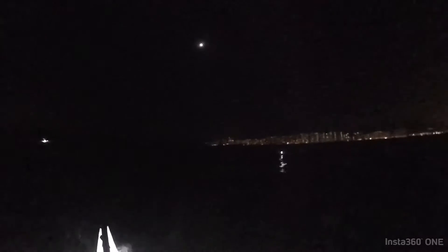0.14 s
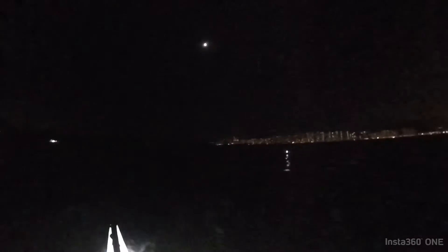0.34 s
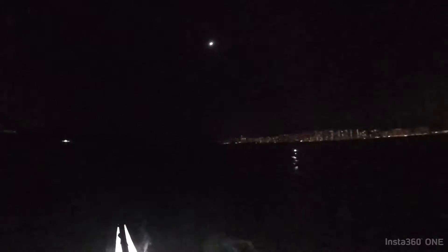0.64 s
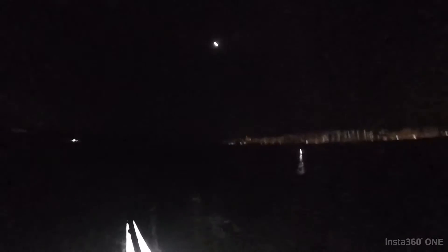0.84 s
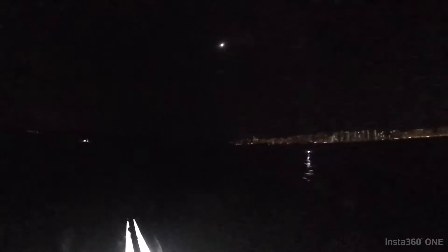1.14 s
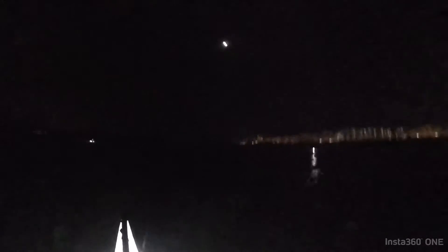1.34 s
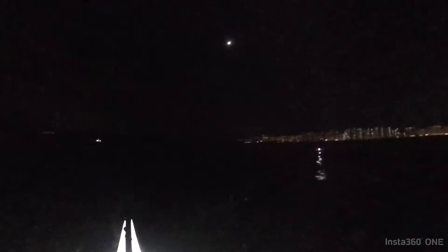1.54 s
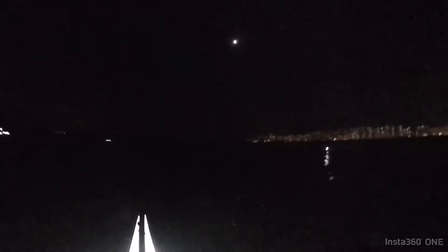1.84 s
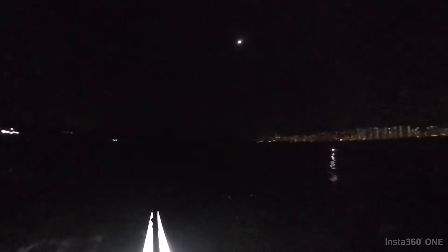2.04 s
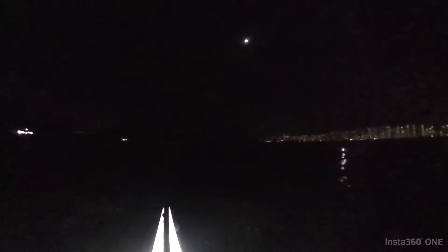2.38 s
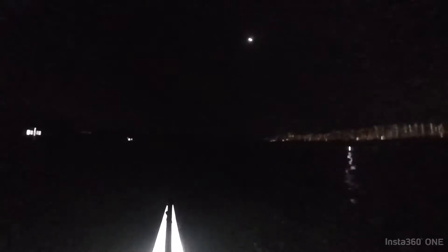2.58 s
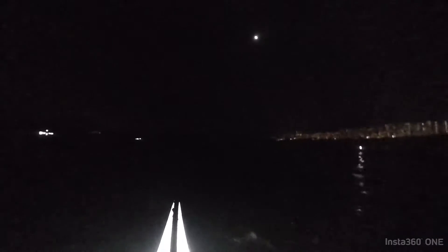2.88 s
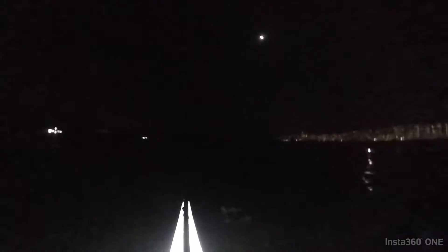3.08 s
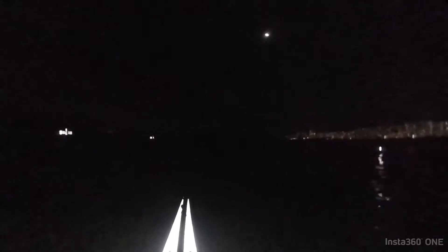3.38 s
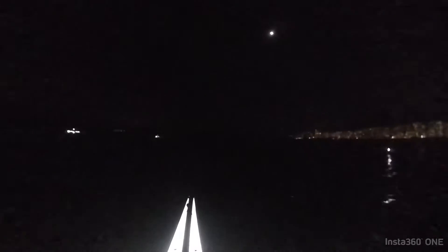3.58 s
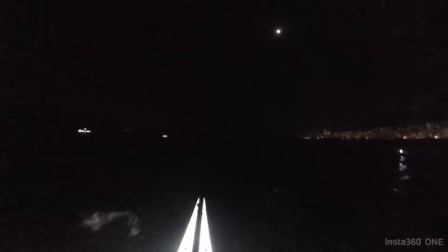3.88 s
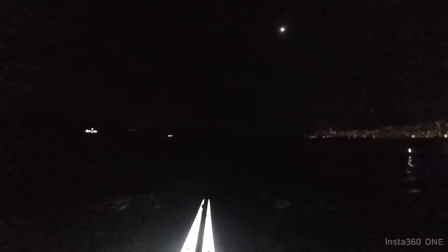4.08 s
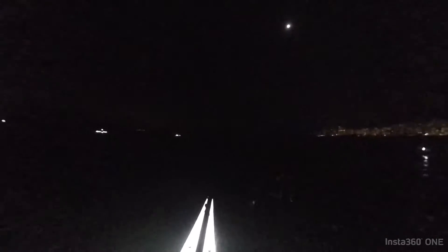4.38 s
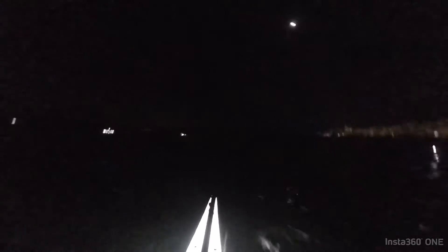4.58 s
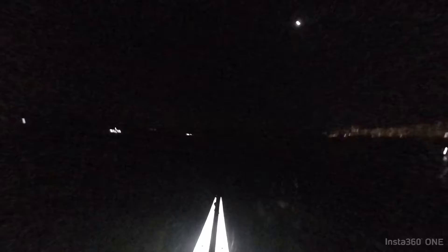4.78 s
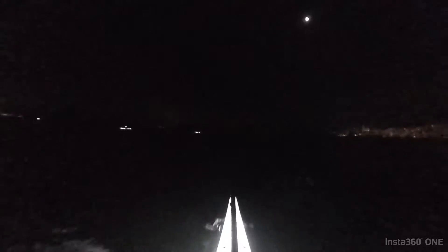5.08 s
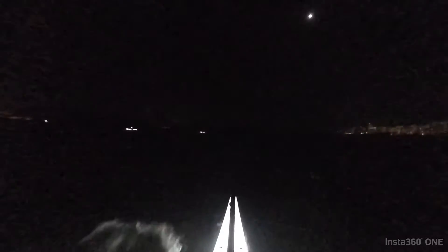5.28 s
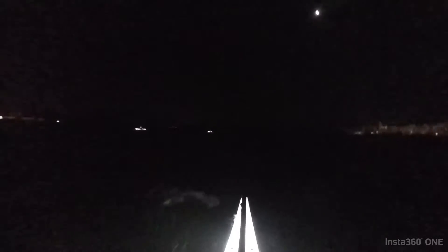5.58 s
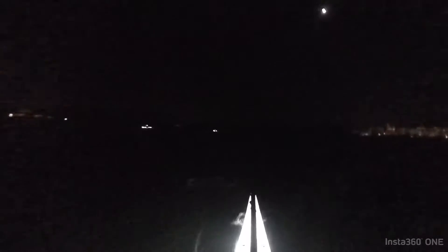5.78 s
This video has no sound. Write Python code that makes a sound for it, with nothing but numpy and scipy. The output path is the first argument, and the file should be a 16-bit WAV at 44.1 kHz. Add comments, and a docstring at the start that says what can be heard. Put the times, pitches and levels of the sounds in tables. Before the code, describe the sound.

Quiet choppy water heard through a camera housing: weak bumps and ticks, small bubble plops, then four harder thumps and brief splashes.

```python
"""Small boat in choppy water

Heard by a camera in a waterproof housing. Wash, spray and mist are noise and bubble grains through
the housing resonances; bubbles, drops, slaps and gurgles are damped or swelling tones.
Wind and spray on the microphone port give thumps, ticks, soft pressure lumps and sloshes, shaped by
the leak and tube of the port. Filtered noise gives a low rumble and microphone hiss."""
import sys
import numpy as np
from scipy.fft import rfft, irfft, next_fast_len
from scipy.io import wavfile
from scipy.ndimage import uniform_filter1d, map_coordinates

SR = 44100
rng = np.random.default_rng(int(sys.argv[2]) if len(sys.argv) > 2 else 0)


def output_pcm(signal):
    """Save a mono or channel-first signal as 16-bit PCM at the path in sys.argv[1].

    Samples are clipped to [-1, 1] before scaling.
    """
    pcm = np.clip(np.atleast_2d(signal).T, -1, 1) * 32767
    wavfile.write(sys.argv[1], SR, np.round(pcm).astype(np.int16))


N = 261513
TIME_S = np.arange(N) / SR

# rumble of hull and wind: time_s, level_db
RUMBLE_LEVEL = [(0.0, -59), (0.3, -69.5), (1.6, -68), (2.4, -68.5), (2.53, -62.5), (2.75, -69),
                (3.9, -72.5), (4.22, -65.5), (5.27, -63.5), (5.45, -67.5), (5.93, -75)]
# rumble spectrum: freq_hz, relative_density_db
RUMBLE_SPECTRUM = [(12, -70), (20, -51), (38, -6), (102, -4.5), (173, -4), (206, -12), (262, -12),
                   (500, -16.5), (650, -42), (1100, -120)]
# microphone hiss spectrum: freq_hz, relative_density_db
HISS_SPECTRUM = [(150, -1), (600, 6.5), (2000, 0.5), (5000, -5), (14900, -4.5), (15250, -3), (15400, -48)]
# gurgles under the hull: middle_s, peak_db, mean_pitch_hz, fade_s (to 1/e on either side)
GURGLES = [(2.504, -58, 166.3, 0.028), (4.234, -56, 111.6, 0.059)]
# flow past the hull: time_s, wash_db, spray_db
WASH_LEVELS = [(0.0, -60, -65.5), (0.18, -65, -75.5), (0.5, -66.5, -73), (0.6, -63, -74), (0.8, -68, -71.5),
               (1.57, -67, -75), (1.68, -60.5, -63), (1.76, -50.5, -61.5), (1.92, -65.5, -72.5),
               (2.3, -69.5, -81.5), (2.85, -65.5, -73.5), (3.29, -77, -81), (3.72, -65.5, -69),
               (3.85, -63.5, -67), (4.33, -65.5, -74.5), (4.8, -62.5, -70.5), (5.35, -60, -66.5),
               (5.5, -52.5, -59), (5.66, -55, -61), (5.77, -68, -71.5), (5.93, -56.5, -70.5)]
# finest mist: time_s, level_db
MIST_LEVEL = [(0.0, -70), (0.21, -74.5), (0.74, -70), (1.2, -78), (1.68, -69.5), (1.92, -76), (2.16, -79),
              (3.5, -79), (3.9, -71.5), (4.33, -76.5), (4.81, -68), (5.46, -69.5), (5.5, -64), (5.65, -62),
              (5.77, -72)]
# main cavity modes: freq_hz, width_hz, relative_db
CAVITY_MODES = [(640, 270, -7.5), (1020, 190, -2), (1296, 131, 0), (1602, 174, -3)]
# housing wall modes: freq_hz, width_hz, relative_db
WALL_MODES = [(2910, 280, -6), (4055, 330, 0.5), (4930, 570, -2.5), (5770, 500, -2.5)]
# highest housing modes: freq_hz, width_hz, relative_db
HIGHEST_MODES = [(9140, 790, -5), (10860, 900, -1.5), (12900, 680, -3.5)]
# clearest bubbles: start_s, peak_db, pitch_hz
BUBBLES = [(0.572, -54, 1240), (0.603, -49, 1270), (1.812, -48, 1100), (2.591, -45.5, 1185),
           (3.467, -45, 1260), (3.808, -48.5, 1390), (3.845, -53, 1580), (3.877, -54, 1640),
           (4.246, -51.5, 1215), (4.458, -43, 1080), (4.518, -48.5, 1250)]
# spray drops on the housing: time_s (each sounds DROP_DELAY_S later), peak_db, pitch_hz
DROPS = [(1.611, -51, 10900), (1.6212, -33, 10640), (1.647, -48, 10500), (1.894, -45, 6040),
         (2.862, -44, 5470), (4.987, -42, 4030), (5.3265, -41, 9500)]
# small slaps of water on the housing: start_s, nominal_level_db
SLAPS = [(5.5201, -31), (5.5315, -40), (5.539, -41.5)]
# water sloshing over the port: start_s, length_s, level_db (ahead of the port)
SLOSHES = [(0.073, 0.025, -55), (0.674, 0.015, -39.5), (1.731, 0.073, -56), (2.965, 0.033, -55.5),
           (3.011, 0.032, -58.5), (3.662, 0.044, -49.5), (5.617, 0.032, -58)]
# slosh spectrum ahead of the port: freq_hz, relative_density_db
SLOSH_SPECTRUM = [(60, -9), (220, -2), (800, -24)]
# soft lumps ahead of the port: crest_s, peak_pressure (negative pulls), fall_ms (to 1/e)
LUMPS = [(.079, -0.01, 0.72), (0.087, -0.023, 14), (.344, 0.013, 2.2), (0.462, 0.014, 2.6),
         (.475, -0.042, 1.18), (.489, 0.017, 2.2), (0.677, -0.012, 2), (0.854, 0.0079, 3),
         (0.986, -.013, 1.33), (1.07, 0.011, 3.3), (1.261, -0.029, 3), (1.277, 0.025, 2.8),
         (1.305, 0.017, 1.2), (1.458, -0.012, 2.2), (1.476, 0.015, 1.34), (1.761, 0.018, 5.5),
         (2.756, -0.0055, 0.5), (2.983, -0.017, 3.8), (3.0442, 0.023, 9.5), (3.0484, -0.025, 1.8),
         (3.692, 0.015, 4), (3.7153, 0.019, 1.8), (3.858, -0.01, 0.4), (3.889, -0.0094, 1.3),
         (3.976, -0.0071, 0.53), (5.244, 0.024, 1.8), (5.33, 0.015, 0.33), (5.414, 0.018, 1.2),
         (5.625, 0.0055, 2.1)]
# sharp ticks ahead of the port: start_s, first_jerk_pressure (negative pulls), decay_ms
TICKS = [(0.1106, -0.099, 0.23), (0.1188, -0.016, 0.16), (0.1495, -0.011, 0.085), (0.152, 0.062, 0.31),
         (0.343, 0.014, 0.2), (0.4854, -0.032, 0.093), (1.27, 0.016, 0.21), (1.759, 0.013, 0.28),
         (1.7719, -0.032, 0.31), (1.7814, -0.036, 0.22), (1.7956, -0.028, 0.14), (3.0429, -0.017, 0.24),
         (3.0716, -0.016, 0.28), (3.6733, 0.018, 0.55), (3.6861, -0.029, 0.26), (3.6918, -0.061, 0.27),
         (3.6934, -0.045, 0.1), (3.6979, -0.033, 0.12), (3.7144, -0.098, 0.068), (3.7186, -0.03, 0.21),
         (4.0094, -0.012, 0.11), (4.3435, -0.0086, 0.13), (5.2529, -0.11, 0.2), (5.2568, -0.026, 0.19),
         (5.369, -0.024, 0.15), (5.3825, -0.025, 0.15), (5.64, 0.015, 0.33), (5.648, -0.053, 0.26),
         (5.655, -0.1, 0.2), (5.6658, 0.031, 0.38)]
# spells of rattling spray, four ticks each: start_s, length_s, nominal_pressure
RATTLES = [(1.776, 0.018, -0.016), (5.365, 0.024, -0.008), (5.647, 0.016, -0.019)]
# blows ahead of the port: snap_s, nominal_level_db, suction_ms
THUMPS = [(0.3341, -23.5, 1.52), (0.69, -25, 0.42), (0.8244, -29, 0.49), (1.2718, -23.5, 1.23),
          (1.5743, -26.5, 1.13), (3.515, -13, 1.03), (5.1053, -14, 1.2), (5.4494, -12.5, 0.93),
          (5.8263, -19, 0.74)]

HISS_DB, TOP_HZ = -64.0, 16500
DROP_DELAY_S, RATTLE_MEAN_MS = 0.0031, 0.16
HARD_FROM_DB = -20  # blows above this are hard
# swell and flutter, relative to the blow level
WEAK_SWELL_DB, WEAK_FLUTTER_DB = -12, -6.5
HARD_SWELL_DB, HARD_FLUTTER_DB = -10, -4
# flutter delay in suction lengths, and stretch of its timing
WEAK_DELAY, WEAK_STRETCH_MS = 0.52, 0.307
HARD_DELAY, HARD_STRETCH_MS = 3.5, 1.01


def amp(db):
    """Amplitude ratio of a level in dB."""
    return 10 ** (np.asarray(db) / 20)


def unit(x):
    """x scaled to rms 1."""
    return x / np.sqrt(np.mean(x ** 2))


def curves(rows):
    """One interpolated value per sample for each column after the time."""
    time_s, *columns = np.transpose(rows)
    return [np.interp(TIME_S, time_s, column) for column in columns]


def wobble(rate_hz):
    """Smooth random curve with rate_hz knots per second."""
    knots = rng.standard_normal(int(N * rate_hz / SR) + 4)
    return map_coordinates(knots, [TIME_S * rate_hz])


def filtered(x, response):
    """x times a frequency response, zero-padded."""
    size = next_fast_len(N + 8192)
    freq_hz = np.fft.rfftfreq(size, 1 / SR)
    return irfft(rfft(x, size) * response(freq_hz), size)[:N]


def coloured(x, points):
    """x through a spectrum interpolated over log frequency, cut outside it, at rms 1."""
    freq_hz, level_db = np.transpose(points)
    return unit(filtered(x, lambda hz: amp(np.interp(np.log(hz + 1), np.log(freq_hz), level_db, -60, -90))))


def resonated(x, modes):
    """x through parallel band-pass modes of alternating sign, at rms 1."""
    def response(f):
        return sum((-1) ** k * amp(db) * 1j * f * width / (hz * hz - f * f + 1j * f * width)
                   for k, (hz, width, db) in enumerate(modes))
    return unit(filtered(x, response))


def add(track, time_s, shape, lead=0):
    """Mix a shape in at time_s, starting lead samples early."""
    start = round(time_s * SR) - lead
    track[start:start + len(shape)] += shape[:N - start]


def background():
    """Uneven low rumble of hull and wind, and steady microphone hiss, from filtered noise."""
    uneven = rng.standard_normal(N) * amp(0.69 * wobble(5.0))
    rumble = amp(curves(RUMBLE_LEVEL)[0]) * coloured(uneven, RUMBLE_SPECTRUM)
    hiss = amp(HISS_DB) * coloured(rng.standard_normal(N), HISS_SPECTRUM)
    return rumble + hiss


def gurgles():
    """A large pocket of air hums for a moment at an unsteady pitch."""
    out = np.zeros(N)
    waver_s = np.cumsum(wobble(21)) / SR
    for middle_s, db, hz, fade_s in GURGLES:
        envelope = np.exp(-((TIME_S - middle_s) / fade_s) ** 2)
        out += amp(db) * envelope * np.sin(2 * np.pi * hz * (TIME_S + 0.1175 * waver_s))
    return out


def grains(count, low_hz, high_hz, cycles, spread_db):
    """Short damped tones at random moments and pitches, each rising a little as a bubble does."""
    when, pitch, size = rng.random((count, 3)).T[..., None]
    hz = low_hz * (high_hz / low_hz) ** pitch
    step = np.arange(int(5 * cycles / low_hz * SR))
    turns = hz * step / SR
    envelope = turns / cycles * np.exp(-2 * turns / cycles)
    tone = np.sin(2 * np.pi * turns * (1 + 0.0079 * turns)) * envelope
    loud = amp(-spread_db * np.log(1 - .99 * size))  # many small, few large
    index = (when * N).astype(int) + step
    return unit(np.bincount(index.ravel(), (loud * tone).ravel(), N)[:N])


def water():
    """Wash bubbles excite the housing cavity, spray and mist its higher modes; all come in lumps."""
    wash_db, spray_db = curves(WASH_LEVELS)
    mist_db, = curves(MIST_LEVEL)
    lap, spatter = wobble(12), wobble(110)
    wash = grains(count=1600, low_hz=949, high_hz=1743, cycles=3.9, spread_db=3.5)
    wash = wash + 2.64 * rng.standard_normal(N)
    spray = grains(count=6000, low_hz=2740, high_hz=6450, cycles=3.7, spread_db=4.0)
    spray = spray + 1.6 * rng.standard_normal(N)
    mist = grains(count=3500, low_hz=8500, high_hz=13600, cycles=4.4, spread_db=3.0)
    mist = mist + 1.4 * rng.standard_normal(N)
    bursts = amp(0.86 * lap + 2.6 * spatter)  # shared by spray and mist
    return (amp(wash_db + 1.5 * lap) * resonated(wash, CAVITY_MODES)
            + amp(spray_db) * resonated(spray * bursts, WALL_MODES)
            + amp(mist_db) * resonated(mist * bursts, HIGHEST_MODES))


def plops():
    """A bubble starts softly and dies as a rough tone; a drop of spray only pings."""
    out, t_s = np.zeros(N), np.arange(1200) / SR
    for start_s, db, hz in BUBBLES:
        # phase wanders as the water moves
        waver_rad = np.cumsum(rng.normal(0, .08, len(t_s)))
        envelope = (1 - np.exp(-t_s / 0.00086)) * amp(-60 * t_s / 0.033)
        ring = np.sin(2 * np.pi * hz * t_s + waver_rad) * envelope
        add(out, start_s, amp(db) * ring / ring.max())
    for time_s, db, hz in DROPS:
        ping = amp(db - 60 * t_s / 0.0037) * np.sin(2 * np.pi * hz * t_s)
        add(out, time_s + DROP_DELAY_S, ping)
    return out


def slaps():
    """Each slap rings the walls and all but the lowest cavity mode, at newly drawn strengths."""
    out, t_s = np.zeros(N), np.arange(900) / SR

    def ring(modes):
        total = np.zeros(len(t_s))
        for k, (hz, width_hz, db) in enumerate(modes):
            strength = (-1) ** k * amp(db + rng.normal(0, 3.4))
            total += strength * np.exp(-np.pi * width_hz * t_s) * np.sin(2 * np.pi * hz * t_s)
        return total

    onset = 1 - np.exp(-t_s / 0.00051)
    for start_s, db in SLAPS:
        add(out, start_s, amp(db) * onset * (ring(CAVITY_MODES[1:]) + 0.62 * ring(WALL_MODES)))
    return out


def sloshes():
    """Low, rounded pressure ripples that swell and fade within each spell."""
    spells = np.zeros(N)
    for start_s, length_s, db in SLOSHES:
        half_s = length_s / 2
        spells += amp(db) * np.exp(-((TIME_S - start_s - half_s) / half_s) ** 4)
    return spells * coloured(rng.standard_normal(N), SLOSH_SPECTRUM)


def lumps():
    """Rounded pushes and pulls that rise faster than they fall."""
    out, t_ms = np.zeros(N), np.arange(-600, 1400) / SR * 1000
    for crest_s, peak, fall_ms in LUMPS:
        width_ms = np.where(t_ms < 0, 0.36 * fall_ms, fall_ms)
        add(out, crest_s, peak * np.exp(-(t_ms / width_ms) ** 2), lead=600)
    return out


def rattle_ticks():
    """Four ticks of random time, strength and decay in each rattling spell."""
    rows = []
    for start_s, length_s, pressure in RATTLES:
        for k, (u, v, w) in enumerate(rng.random((4, 3))):
            rows.append((start_s + length_s * (k + u) / 4, pressure * (0.72 + v), RATTLE_MEAN_MS * (.5 + w)))
    return rows


def ticks():
    """A sudden jerk that relaxes at once, rattles four times more and rings the cavity faintly."""
    out, t_ms = np.zeros(N), np.arange(500) / SR * 1000
    ring = -.08 * np.sin(2 * np.pi * 1.464 * t_ms) * np.exp(-t_ms / 3.5)  # 1.464 kHz
    for start_s, peak, decay_ms in list(TICKS) + rattle_ticks():
        late, size = rng.random((4, 2)).T
        delays_ms = np.append(0, 0.34 + 3.6 * late)
        strengths = np.append(1, 0.78 * (size - .35))
        since_ms = np.maximum(t_ms - delays_ms[:, None], 0)
        jerks = (1 - np.exp(-since_ms / (0.18 * decay_ms))) ** 2 * np.exp(-since_ms / decay_ms)
        add(out, start_s, peak * (strengths @ jerks / jerks.max() + ring))
    return out


def port_flutter(t_ms, first_ms, stretch_ms):
    """Nine flaps of the port at uneven intervals, of random size under a decaying envelope."""
    gap, size, short = rng.random((9, 3)).T
    starts_ms = first_ms + stretch_ms * (np.cumsum(0.148 + 1.4 * gap ** 2) - 1.4 * gap[0] ** 2)
    since_ms = np.maximum(t_ms - starts_ms[:, None], 0)
    decay_ms = 0.19 + 0.5 * short[:, None] ** 2
    flaps = (1 - np.exp(-since_ms / 0.041)) * np.exp(-since_ms / decay_ms)
    weights = (1.97 * size - .45) * np.exp(-(starts_ms - starts_ms[0]) / (4.9 * stretch_ms))
    return weights @ flaps


def thumps():
    """Pressure swells, snaps over into suction and recovers; the port flutters with fading strength."""
    out, t_ms = np.zeros(N), np.arange(-600, 1400) / SR * 1000
    after_ms = np.maximum(t_ms, 0)
    for snap_s, db, suction_ms in THUMPS:
        if db > HARD_FROM_DB:
            swell_db, flutter_db, delay, stretch_ms = HARD_SWELL_DB, HARD_FLUTTER_DB, HARD_DELAY, HARD_STRETCH_MS
        else:
            swell_db, flutter_db, delay, stretch_ms = WEAK_SWELL_DB, WEAK_FLUTTER_DB, WEAK_DELAY, WEAK_STRETCH_MS
        edge_ms = 0.034 * amp(-.3 * (db - 8.0))  # weaker blows snap less sharply
        rise = amp(swell_db) * np.exp(-(t_ms / 3.8) ** 4)
        crest = 1.19 * np.exp(np.minimum(t_ms, 0) / 0.038)
        swell = (t_ms < 0) * (rise + crest)
        snap = (t_ms >= 0) * 1.34 * np.exp(-after_ms / edge_ms)
        suction = 1.6 * (1 - np.exp(-after_ms / 0.34)) * np.exp(-(after_ms / suction_ms) ** 1.78)
        flutter = port_flutter(t_ms, delay * suction_ms, stretch_ms)
        churn = uniform_filter1d(rng.standard_normal(len(t_ms)), size=9) * np.exp(-((t_ms - 3.5) / 8.8) ** 2)
        blow = swell + snap - suction + amp(flutter_db) * (flutter + 0.041 * churn)
        add(out, snap_s, amp(db) * blow, lead=600)
    return out


def port(pressure, leak_hz=45, damping=0.72, tube_hz=10500, loss=0.22):
    """Slow pressure leaks away, so pushes swing back; the short tube resonates and dulls what lies above."""
    def response(hz):
        leak = -hz ** 2 / (leak_hz ** 2 - hz ** 2 + 1j * damping * leak_hz * hz)
        tube = tube_hz ** 2 / (tube_hz ** 2 - hz ** 2 + 1j * loss * tube_hz * hz)
        return leak * tube / (1 + 1j * hz / 9000)
    return filtered(pressure, response)


def scene():
    """Port pressure through the port, plus water, housing and background sounds."""
    at_port = port(thumps() + ticks() + lumps() + sloshes())
    return (at_port + water() + plops() + slaps() + gurgles() + background())[None]


def record(dry):
    """The camera keeps nothing at or above its band limit."""
    return filtered(dry[0], lambda hz: hz < TOP_HZ)[None]


dry = scene()
out = record(dry)
output_pcm(out)
```